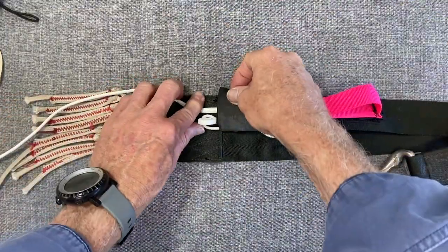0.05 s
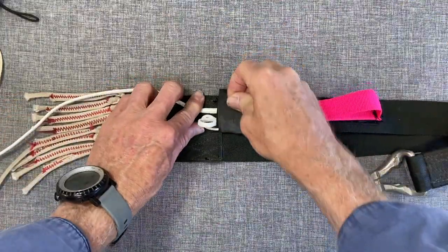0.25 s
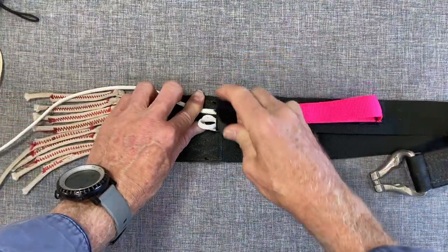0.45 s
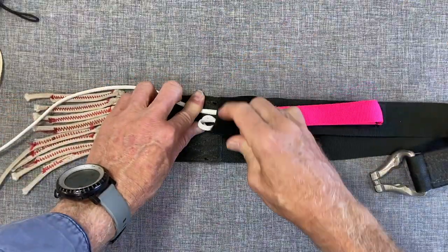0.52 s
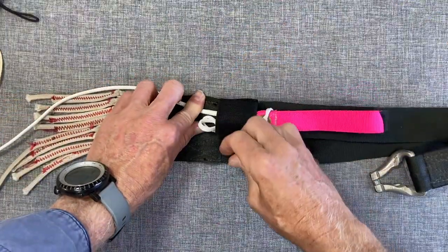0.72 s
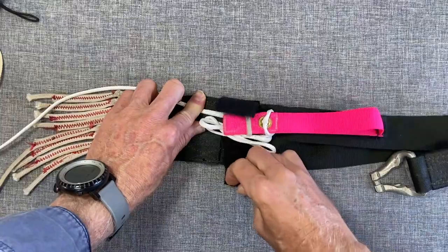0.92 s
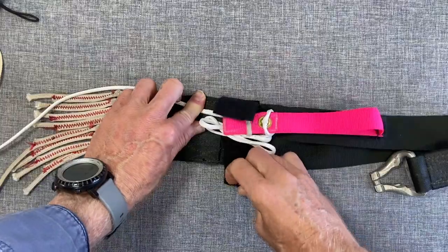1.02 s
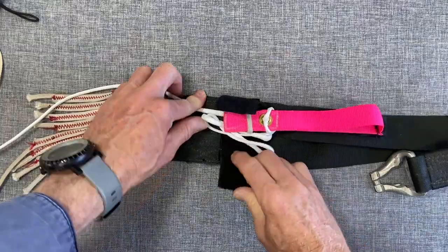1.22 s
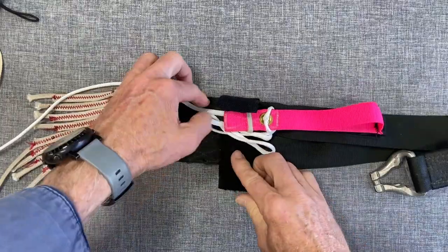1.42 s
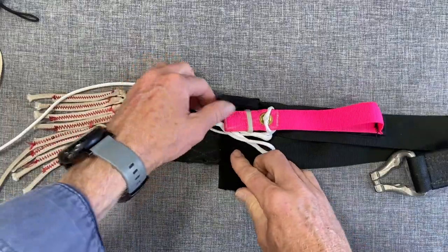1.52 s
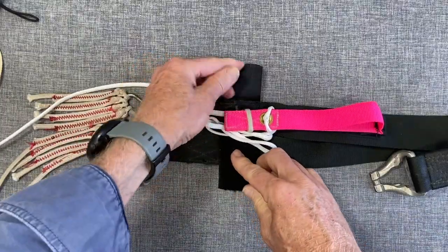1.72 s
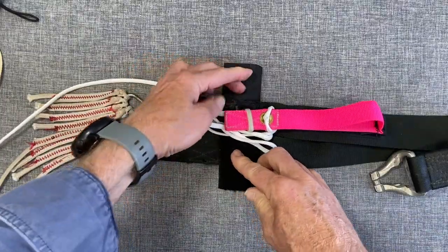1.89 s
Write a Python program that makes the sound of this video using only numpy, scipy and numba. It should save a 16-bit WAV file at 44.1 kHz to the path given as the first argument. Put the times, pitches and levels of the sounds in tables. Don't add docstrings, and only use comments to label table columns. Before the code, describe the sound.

Hook-and-loop fastener peeled apart: one rough, swelling rip, a quiet gap, then a brief softer tear.

```python
import sys
import numpy as np
from scipy import signal
from scipy.fft import rfft, irfft
from scipy.io import wavfile
from scipy.ndimage import uniform_filter1d
from numba import njit

SR = 44100
rng = np.random.default_rng(int(sys.argv[2]) if len(sys.argv) > 2 else 0)


def dump(signal):
    limited = np.clip(np.atleast_2d(signal).T, -1, 1)
    pcm = np.round(limited * 32767).astype(np.int16)
    wavfile.write(sys.argv[1], SR, pcm)


def to_linear_factor(level_db):
    exponent = np.asarray(level_db, float) / 20
    return 10 ** exponent


N = 85995

# time_s, level_db, thump_db, tick_db, hooks_per_ms
PULL_START = [
    (.115, -49, -16, -3, 0.24),
    (.125, -51.5, 0.5, 2.5, 0.44),
    (.19, -57.5, -8, -9, 1),
    (.26, -43, -3, -12, 0.86),
    (.288, -67, -21, -15.5, 0.84),
]
PULL_RISE = [
    (.3, -36, -13, -10, 1.4),
    (.33, -34.5, -16, -9.5, 1.8),
    (0.391, -34.5, -11, -6, 2.44),
    (.45, -42, -9, -6, 1.66),
    (0.482, -36, -7.5, -3.5, 2.96),
    (0.52, -33.5, -5.5, -10, 2.2),
    (.552, -74, -3, 27, 0.93),
]
PULL_PEAK = [
    (0.558, -60, 12, -11, 1),
    (0.588, -39.5, -16, 5.5, 1.6),
    (.63, -38.5, -9, -5.5, 3.5),
    (0.692, -42.5, -8, 1.5, 0.54),
    (0.711, -34.5, -9, -2, 2.2),
    (.755, -31.5, -4, 1, 3.6),
    (0.824, -28.5, -7, -7, 2.9),
    (0.833, -28.5, -13.5, -17, 6.8),
]
PULL_LATE = [
    (1.61, -68, 14, 3, 1.35),
    (1.652, -59.5, -1.5, -8, 2.2),
    (1.664, -36, -12.5, -18.5, 12),
    (1.677, -37, -12.5, -14, 6.2),
    (1.692, -52.5, -6.5, -9.5, 3.3),
    (1.771, -52, -13, -25, 1.96),
    (1.8, -75, 0, -17, 2.3),
]
# peak_s, peak_db, ring_hz, thump_db
POPS_EARLY = [(0.1199, -34, 3770, -13), (0.1211, -45, 3880, -10), (0.123, -40, 4160, -8),
              (0.1271, -39, 3660, -9), (0.1368, -40, 4630, -5), (0.1483, -41, 4110, -15),
              (0.1573, -39, 4180, -13), (0.1709, -44, 4070, -8), (0.1786, -46, 3980, -9),
              (0.2017, -34, 3940, -15), (0.2073, -35, 3620, -17), (0.2141, -26, 4290, -13),
              (0.2228, -30, 5060, -11), (0.2241, -26, 5840, -14), (0.2257, -31, 3880, -11),
              (0.2421, -28, 5320, -21), (0.246, -20, 5280, -20), (0.2473, -33, 4330, -9),
              (0.2548, -30, 5400, -19), (0.2571, -26, 5380, -23), (0.26, -20, 5360, -26),
              (0.2639, -25, 5880, -20), (0.2654, -28, 3900, -19), (0.2705, -20, 5450, -23),
              (0.3028, -24, 5280, -25), (0.3066, -29, 4630, -17), (0.3124, -24, 4910, -16),
              (0.3141, -22, 5580, -13), (0.3154, -26, 5560, -10), (0.3168, -26, 4840, -15),
              (0.3198, -25, 4050, -8), (0.3223, -20, 5250, -17), (0.3253, -19, 4890, -17),
              (0.3362, -23, 5190, -16), (0.3434, -27, 5170, -17), (0.3461, -24, 4840, -17),
              (0.348, -25, 4440, -17), (0.3549, -15, 4870, -17), (0.3649, -25, 8530, -15),
              (0.3663, -25, 5080, -15), (0.377, -24, 4330, -13), (0.3793, -25, 3940, -15),
              (0.3817, -23, 6160, -11)]
POPS_LATER = [(0.3863, -25, 3380, -12), (0.4084, -27, 3510, -15), (0.4106, -27, 4110, -13),
              (0.4146, -28, 5060, -11), (0.4234, -26, 4740, -10), (0.4315, -26, 4480, -10),
              (0.4344, -26, 4260, -14), (0.4375, -23, 4740, -13), (0.4602, -23, 4610, -18),
              (0.4677, -29, 4610, -18), (0.4703, -26, 4670, -12), (0.4745, -24, 2760, -6),
              (0.4765, -23, 5150, -7), (0.4846, -29, 4220, -9), (0.4917, -23, 3120, -10),
              (0.507, -28, 4890, -13), (0.509, -27, 5320, -5), (0.5176, -25, 4570, -13),
              (0.5289, -27, 4930, -19), (0.5648, -31, 4520, -10), (0.5765, -30, 4290, -10),
              (0.5807, -25, 4500, -14), (0.5838, -26, 3960, -10), (0.5861, -25, 4110, -13),
              (0.5934, -27, 4050, -16), (0.6038, -30, 3900, -13), (0.6093, -24, 4800, -14),
              (0.611, -23, 3250, -9), (0.618, -22, 4260, -18), (0.6227, -24, 4260, -12),
              (0.6258, -21, 4410, -10), (0.636, -25, 5230, -14), (0.638, -29, 4350, -7),
              (0.6485, -29, 4410, -10), (0.6617, -29, 4410, -13), (0.6646, -27, 5080, -14),
              (0.6841, -26, 4570, -21), (0.688, -30, 4220, -16), (0.6961, -32, 2970, -5),
              (0.6981, -32, 4460, -12), (0.6994, -30, 3360, -21), (0.7075, -23, 4110, -16),
              (0.712, -24, 3920, -9)]
# start_s, peak_db, thump_db
SNAPS = [
    (.4585, -24, -18.5),
    (.7055, -23.5, -15.5),
    (.7095, -31.5, -12),
]
# start_s, peak_db, thump_db, ring_hz
KNOCKS = [
    (1.6160, -45, -14, 4080),
    (1.6220, -46, -8, 3480),
    (1.709, -40, -24, 2880),
    (1.7575, -43, -21, 3240),
    (1.8728, -55, -11, 4000),
    (1.8838, -55, -8, 3650),
]
# time_s, ring_hz, upper_mode_db
HOOK_RING = [(.1, 4030, -2), (.25, 5270, -3.5), (.4, 4760, 4.5), (.47, 4930, -4.5), (.62, 4460, 1.5),
             (.8, 4900, -3.5), (1.6, 4010, -8.5)]
# mode_hz, ring_cycles, level_db
STRAP_MODES = [(1078, 8, -4.5), (2033, 20.1, -10)]
# start_s, level_db, ring_hz, ring_cycles
BUMPS = [(0.121, -43, 330, 9.8), (0.861, -48.5, 90, 10), (1.1118, -43, 7200, 11), (1.4538, -28, 2550, 2.9),
         (1.4540, -40, 5160, 6.3), (1.4536, -44.5, 910, 8.3), (1.545, -49, 10600, 23),
         (1.587, -49, 14000, 30), (1.62, -42.5, 200, 5.5), (1.638, -42, 14000, 37), (1.912, -53.5, 876, 89)]
# band_hz, t60_s
ROOM_T60 = [(300, 0.33), (1000, 0.18), (3000, 0.26), (7000, 0.06), (13000, 0.17)]
# time_s, level_db
HANDS = [(0, -58), (.06, -67), (.11, -65), (.2, -62), (.9, -59), (0.999, -73.5), (1.04, -62), (1.1, -65.5),
         (1.14, -69), (1.231, -67.5), (1.4, -84), (1.47, -69), (1.6, -70), (1.778, -64.5), (1.84, -83),
         (1.9, -60), (1.95, -59.5)]
# freq_hz, density_db
CLOTH = [(240, -12), (400, -2), (1740, -5), (3240, -6), (4600, -4), (6800, -8.5), (7800, -13.5),
         (15000, -18.5)]
# freq_hz, density_db
SLEEVE_SHEEN = [(3000, -12), (4500, 0), (7000, -12), (9500, -5), (13000, -16)]
# freq_hz, density_db
AIR_COLOUR = [(4.7, -52), (8.0, 14.5), (69, -9.5), (95, -16.5), (232, -20), (361, -27.5), (397, -24),
              (774, -31.5), (15800, -50.5)]

HOOK_SPREAD, HOOK_CYCLES, SWELL_CYCLES = 0.26, 7.4, 0.97
TICK_HZ, TICK_CYCLES = 10040, 12.6
STRAP_SPREAD = 0.1
BENCH_HZ, BENCH_CYCLES, BENCH_DB = 330, 9.9, -30
SIZE_SPREAD_DB = 3
SWARM_HZ, SWARM_DB, SWARM_GAIN_DB = 146.6, 2.06, -3
POP_GAIN_DB, POP_ECHO_DB, POP_THUMP_DB, POP_TICK_DB, POP_MS = 4, -11, 3, -15, 1.6
SNAP_GAIN_DB, FOLLOW_DB, SWARM_MS = 3, -3, 4.5
SNAP_TICK_DB, KNOCK_TICK_DB = -11, -18
SHAKE_HZ, SHAKE_DB = 133, -25.5
ROOM_DB, ROOM_GAP_S = -10.5, 0.0019
SLEEVE_MID_S, SLEEVE_HALF_S, SLEEVE_DB = 1.063, 0.045, -65
AIR_DB = -53
HUM_HZ, HUM_WIDTH_HZ, HUM_DB, HUM_FADES_S = 262.4, 100, -70.5, 1.3


def tear(pull, swarm):
    p = np.array(pull, float)
    slots = 1600
    jitter, chance, strength = rng.random((slots, 3)).T
    at = (np.round(p[0, 0] * 10) * 400 - 300 + np.arange(slots) + jitter) / 4000
    level_db, thump_db, tick_db, per_ms = (np.interp(at, p[:, 0], p[:, k]) for k in (1, 2, 3, 4))
    share = np.clip(per_ms / 4, .05, 1)
    released = np.clip((share - chance) * 10, 0, 1)
    size = released * to_linear_factor(-SIZE_SPREAD_DB * np.log(1 - .9 * strength)) / np.sqrt(share)
    swarm_now = swarm[np.minimum(at * SR, N - 1).astype(int)]
    size = size * to_linear_factor(level_db + SWARM_GAIN_DB + SWARM_DB * swarm_now)
    inside = (at > p[0, 0]) * (at < p[-1, 0])
    return hooks(at, size * inside, hook_hz(at), thump_db, tick_db, HOOK_SPREAD)


def followers(events, count):
    return (rng.random((events, count)) * (np.arange(count) > 0)).ravel()


def pops(table, count=3):
    peak_s, db, hz, thump_db = np.repeat(np.array(table, float), count, axis=0).T
    late = followers(len(table), count)
    size = to_linear_factor(db + POP_GAIN_DB + POP_ECHO_DB * (late > 0))
    at = peak_s - SWELL_CYCLES / hz + late * POP_MS / 1000
    return hooks(at, size, hz, thump_db + POP_THUMP_DB, POP_TICK_DB, HOOK_SPREAD * (late > 0))


def snaps(table, tick_db, wide, count=8):
    e = np.repeat(np.array(table, float), count, axis=0)
    late = followers(len(table), count)
    follow_db = FOLLOW_DB - 11.0 * late + 1.1 * rng.standard_normal(len(e))
    size = to_linear_factor(e[:, 1] + SNAP_GAIN_DB + (late > 0) * follow_db)
    at = e[:, 0] + late * SWARM_MS / 1000
    hz = e[:, 3] if e.shape[1] > 3 else hook_hz(at)
    spread = HOOK_SPREAD * np.where(late > 0, 1, .3) * wide
    return hooks(at, size, hz, e[:, 2] + 8, tick_db, spread)


def hooks(at, size, hz, thump_db, tick_db, spread):
    c = rng.standard_normal((len(at), 11)).T
    one = np.ones(len(at))
    size = 2 * size * np.sign(c[0])

    def part(part_hz, cycles, db):
        return ring(at, np.minimum(part_hz, SR / 3), cycles * one, size * to_linear_factor(db), SWELL_CYCLES, N, SR)

    out = part(hz * np.exp(spread * c[10]), HOOK_CYCLES * np.exp(0.29 * c[1]), 0 * one)
    out = out + part(TICK_HZ * np.exp(0.42 * c[2]), TICK_CYCLES, tick_db + 3 * c[3])
    time_s, _, upper_db = np.array(HOOK_RING, float).T
    for k, (mode_hz, cycles, db) in enumerate(STRAP_MODES):
        mode_db = thump_db + db + 3 * c[6 + k] + k * np.interp(at, time_s, upper_db)
        out = out + part(mode_hz * np.exp(STRAP_SPREAD / (k + 1) * c[4 + k]), cycles, mode_db)
    bench_db = thump_db + BENCH_DB + 3 * c[9]
    return out + part(BENCH_HZ * np.exp(0.33 * c[8]), BENCH_CYCLES, bench_db)


def hook_hz(at):
    time_s, hz, _ = np.array(HOOK_RING, float).T
    return np.interp(at, time_s, hz)


@njit
def ring(at, hz, cycles, size, swell, n, sr):
    y = np.zeros(n)
    for g in range(len(at)):
        if size[g] == 0:
            continue
        i0 = int(at[g] * sr) + 1
        for i in range(max(i0, 0), min(n, i0 + int(cycles[g] * sr / hz[g]) + 2)):
            c = (i / sr - at[g]) * hz[g]
            envelope = min(c / swell, 1.) ** 2 * np.exp(-6.9 * c / cycles[g])
            y[i] += size[g] * envelope * np.sin(2 * np.pi * c)
    return y


def bumps():
    start_s, level_db, hz, cycles = np.array(BUMPS, float).T
    return ring(start_s.copy(), hz.copy(), cycles.copy(), to_linear_factor(level_db), SWELL_CYCLES, N, SR)


def shake(near):
    force = np.sqrt(np.abs(uniform_filter1d(near ** 2, SR // 20)))
    colour = [(20, -8), (SHAKE_HZ, 0), (3 * SHAKE_HZ, -22), (16000, -90)]
    return force * to_linear_factor(SHAKE_DB) * shade(rng.standard_normal(N), colour)


def hands():
    time_s, level_db = np.array(HANDS, float).T
    grain = rng.standard_normal(N) * to_linear_factor(1.24 * walk(270) + 0.35 * walk(17.0))
    return shade(grain, CLOTH) * to_linear_factor(np.interp(np.arange(N) / SR, time_s, level_db))


def sleeve():
    shape = np.exp(-((np.arange(N) / SR - SLEEVE_MID_S) / SLEEVE_HALF_S) ** 6)
    grain = rng.standard_normal(N) * to_linear_factor(2.3 * walk(220))
    return shade(grain, SLEEVE_SHEEN) * to_linear_factor(SLEEVE_DB) * shape


def room(x):
    t, tail = np.arange(SR // 2) / SR, 0
    for hz, t60_s in ROOM_T60:
        edges_hz = [hz / 1.84, min(hz * 1.12, .45 * SR)]
        sos = signal.butter(2, edges_hz, "band", fs=SR, output="sos")
        band = signal.sosfilt(sos, rng.standard_normal(len(t)))
        tail = tail + band * to_linear_factor(-60 * t / t60_s)
    tail = tail * np.clip(t / ROOM_GAP_S, 0, 1) ** 2
    return signal.fftconvolve(x, tail / np.sqrt(np.sum(tail ** 2)))[:N]


def air():
    hum_colour = [(HUM_HZ - HUM_WIDTH_HZ, -40), (HUM_HZ, 0), (HUM_HZ + HUM_WIDTH_HZ, -40)]
    hum = shade(rng.standard_normal(N), hum_colour)
    hum = hum * to_linear_factor(HUM_DB - 20 * np.clip(np.arange(N) / SR - HUM_FADES_S, 0, .5))
    return shade(rng.standard_normal(N), AIR_COLOUR) * to_linear_factor(AIR_DB + 0.61 * walk(4.7)) + hum


def shade(x, points):
    hz, db = np.array(points, float).T
    f = np.arange(len(x) // 2 + 1) * SR / len(x) + 1
    y = irfft(rfft(x) * to_linear_factor(np.interp(np.log(f), np.log(hz), db)), len(x))
    return y / np.std(y)


def walk(rate_hz):
    k = int(SR / rate_hz)
    w = uniform_filter1d(np.repeat(rng.standard_normal(N // k + 1), k), k)[:N]
    return w / np.std(w)


def scene():
    swarm = walk(SWARM_HZ)
    near = sum(tear(p, swarm) for p in (PULL_START, PULL_RISE, PULL_PEAK, PULL_LATE))
    near = near + pops(POPS_EARLY + POPS_LATER)
    near = near + snaps(SNAPS, SNAP_TICK_DB, 0.39)
    near = near + snaps(KNOCKS, KNOCK_TICK_DB, .8)
    near = near + bumps()
    mix = near + to_linear_factor(ROOM_DB) * room(near) + hands() + sleeve() + air() + shake(near)
    return mix[None]


def band_limit(x):
    return signal.sosfilt(signal.butter(12, 15940, fs=SR, output="sos"), x)


def record(dry):
    return band_limit(dry)


dry = scene()
out = record(dry)
dump(out)
```